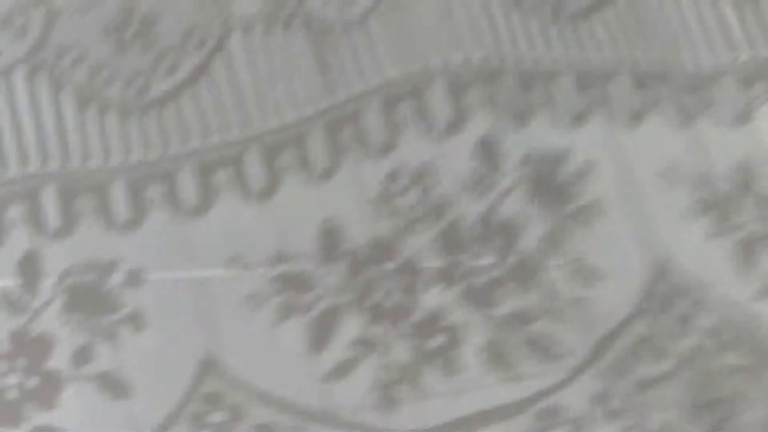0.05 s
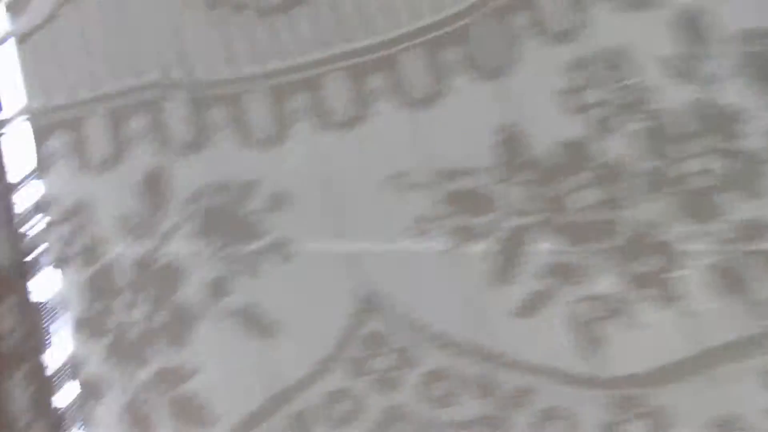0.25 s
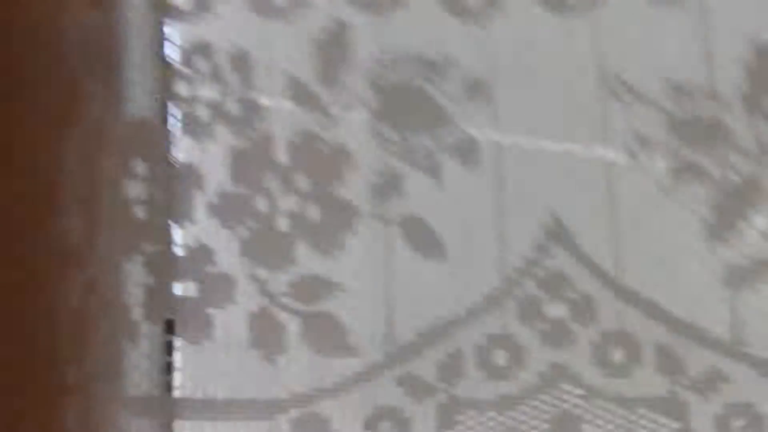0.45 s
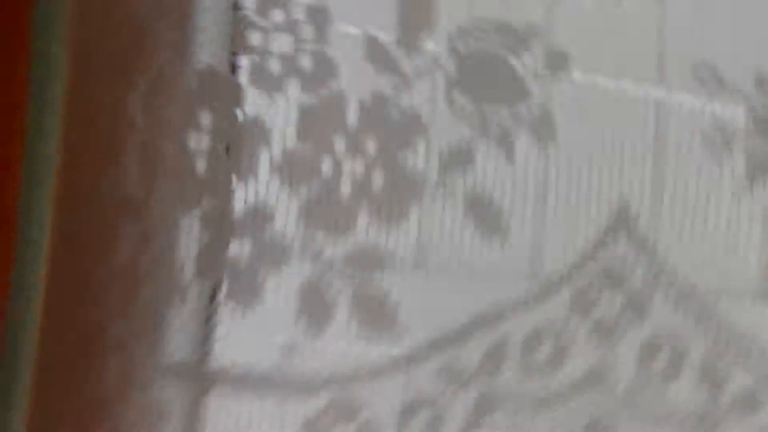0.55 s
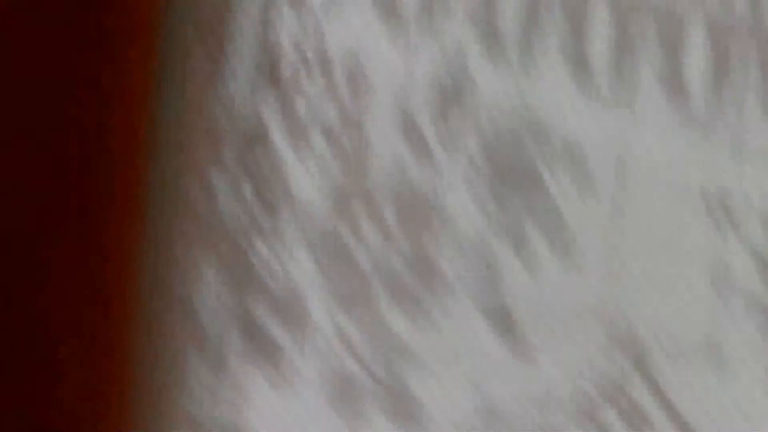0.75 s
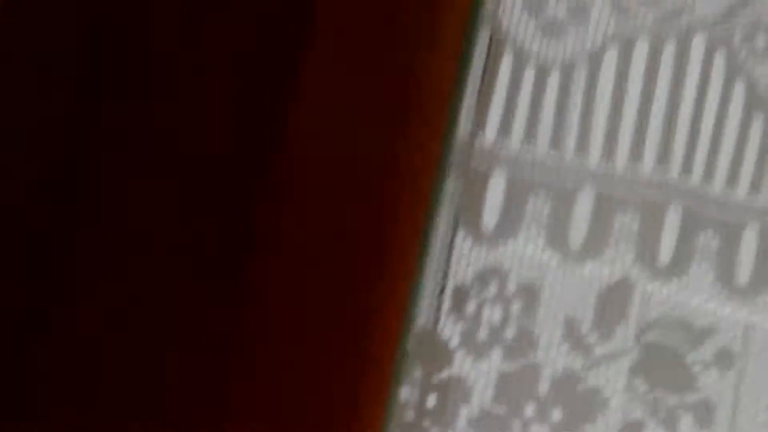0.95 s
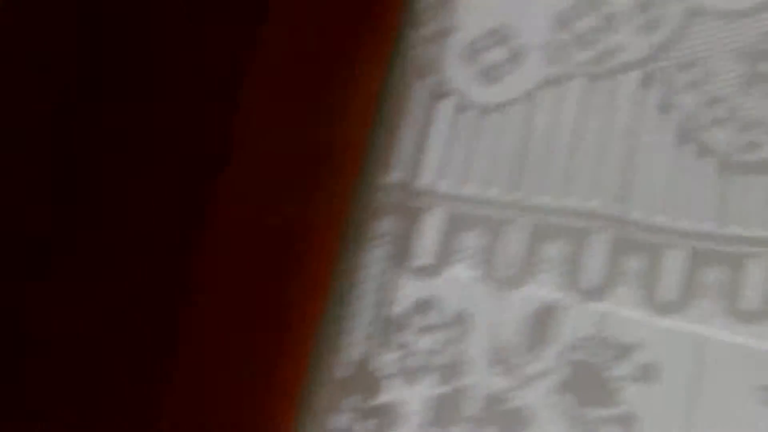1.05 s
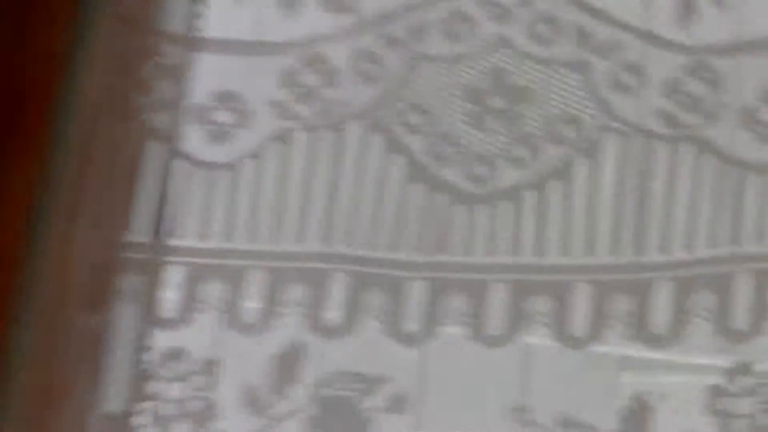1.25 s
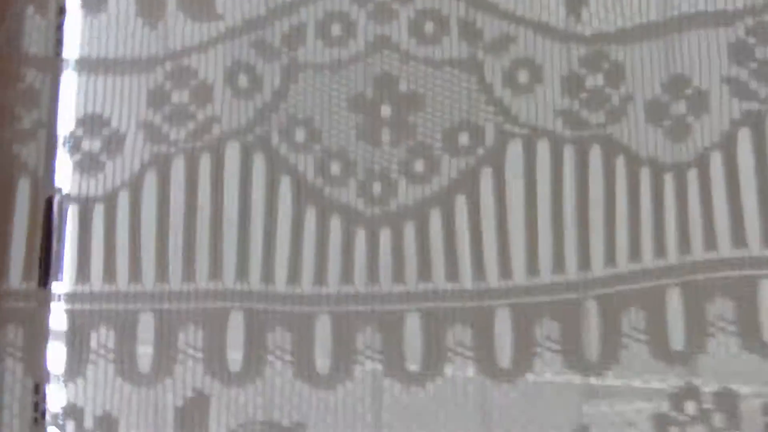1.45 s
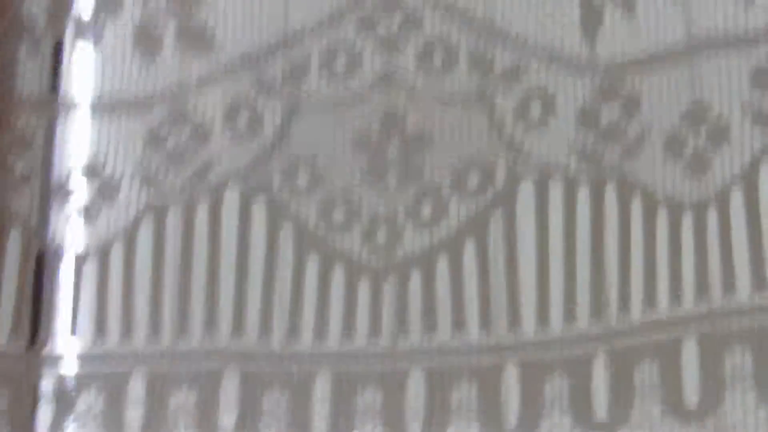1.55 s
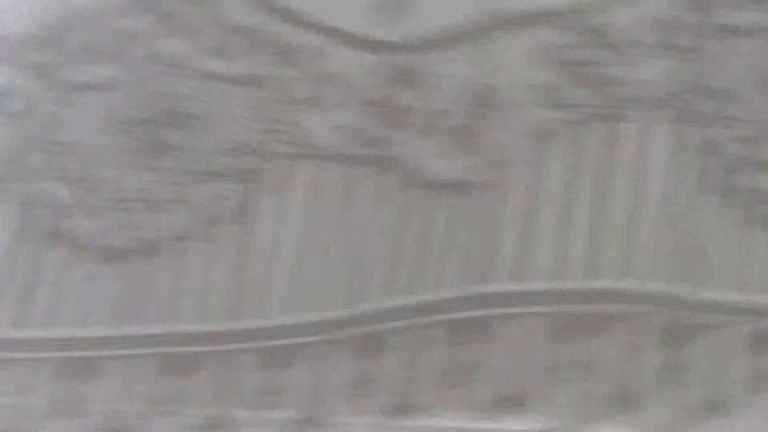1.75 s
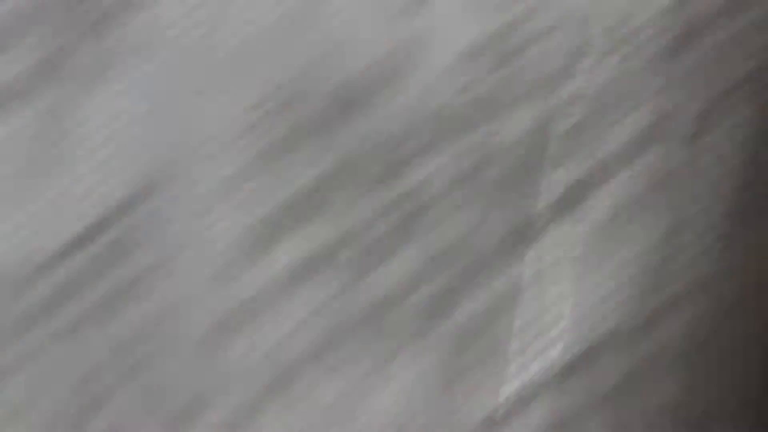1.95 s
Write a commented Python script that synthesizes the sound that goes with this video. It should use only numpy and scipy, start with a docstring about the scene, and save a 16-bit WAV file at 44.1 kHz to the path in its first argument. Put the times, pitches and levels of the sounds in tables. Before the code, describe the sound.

Curtain rings scrape along a metal rod with a brief squeak, then clack together. Sharp clicks and hollow knocks from fittings follow close to the microphone, over softly rustling lace in a small room.

```python
"""Lace curtain drawn aside

A small room, in stereo. Up on a metal rod the rings scrape, squeak once and clack together in a few tugs.
The cloth rustles and swishes as its fibres rub; close to the microphone hard fittings click and knock.
The room rings briefly, and the recorder's limiter ducks after the hardest click."""
import sys
import numpy as np
from scipy import signal
from scipy.fft import rfft, irfft, next_fast_len
from scipy.io import wavfile
from scipy.ndimage import uniform_filter1d, minimum_filter1d, map_coordinates

SR = 44100
rng = np.random.default_rng(int(sys.argv[2]) if len(sys.argv) > 2 else 0)


def waveform_to_disk(signal):
    """Save audio, clipped to [-1, 1], as 16-bit WAV at the path in sys.argv[1]."""
    frames = np.transpose(np.atleast_2d(signal))
    scaled = np.clip(frames, -1, 1) * 32767
    samples = np.round(scaled).astype(np.int16)
    wavfile.write(sys.argv[1], SR, samples)


N = 88200

SLIPS_PER_S, SLIP_SCATTER_DB, CHATTER_PER_S = 20000, 1.5, 120
DIRECT_SIDE_DB = -7.5  # sound that comes straight from its source is narrower


def amp(db):
    return 10 ** (np.asarray(db) / 20)


def unit(x):
    return x / np.sqrt(np.mean(x ** 2) + 1e-20)


def clock():
    return np.arange(N) / SR


def along(points, hz):
    """(f/Hz, value) points joined on a log frequency axis."""
    f, v = np.transpose(points)
    return np.interp(np.log(hz + 1), np.log(f + 1), v)


def curve(rows):
    """(t/s, value) points joined by straight lines."""
    return np.interp(clock(), *np.transpose(rows))


def wobble(per_s):
    """A smooth random curve with per_s knots a second."""
    return map_coordinates(rng.standard_normal(N // 20), [clock() * per_s], mode="wrap")


def burst(s, rise, t60):
    """An envelope that rises from time s, then dies away."""
    t = clock() - s
    return np.clip(t / rise, 0, 1) * amp(-60 * np.maximum(t - rise, 0) / t60)


def coloured(x, gain_db):
    """x through a causal filter of unit power with the given dB shape."""
    size = 2 * next_fast_len(N * 3 // 4)
    gain = unit(amp(gain_db(np.fft.rfftfreq(size, 1 / SR))))
    cepstrum = irfft(np.log(np.maximum(gain, 1e-6)), size)
    cepstrum[1:size // 2] *= 2  # folded for minimum phase
    cepstrum[size // 2 + 1:] = 0
    return irfft(rfft(x, size) * np.exp(rfft(cepstrum)), size)[..., :N]


def spread(pair, side_db=0):
    """Two unrelated signals become left and right: near mono in the bass, wide in the treble."""
    # width of diffuse sound at the microphone: f/Hz, side against mid/dB
    width = [(1000, -15.5), (2500, -23), (5000, -2.5), (12000, 1)]
    size = pair.shape[1]
    side = irfft(rfft(pair[1]) * amp(side_db + along(width, np.fft.rfftfreq(size, 1 / SR))), size)
    return np.array([pair[0] + side, pair[0] - side])


def grains(per_s, scatter_db, side_db):
    """Tiny contacts at random moments and of random size, in stereo."""
    hit = rng.random((2, N)) < per_s / SR
    size = np.sign(rng.standard_normal((2, N))) * amp(scatter_db * rng.standard_normal((2, N)))
    return spread(unit(hit * size), side_db)


def cloth():
    """Fibres rub all around as the folds shift; twice the lace swishes just ahead of the microphone."""
    # rustle of the cloth: t/s, level/dB
    rustle = [(0, -44), (.19, -43.5), (.26, -30), (.35, -42.5), (.48, -41.5), (.525, -26), (.57, -38),
              (.75, -36.5), (.82, -43.5), (1.05, -43), (1.16, -43.5), (1.32, -47), (1.52, -50),
              (1.578, -36.5), (1.605, -45.5), (1.9, -44), (1.97, -44), (2, -52)]
    # spectrum of the rustle: f/Hz, density/dB
    rustle_colour = [(30, -52), (170, -20.5), (380, -6), (650, 3.5), (2400, 3), (4500, -3.5), (15000, -11)]
    # light swishes: peak t/s, level/dB, rise/s, t60/s
    swishes = [(1.385, -38.5, 0.067, 0.28), (1.96, -32, 0.058, 0.46)]
    # spectrum of a swish: f/Hz, density/dB
    swish_colour = [(30, -56), (500, -9), (2500, 4.5), (10000, 2.5), (15000, 0.5)]
    rub = coloured(grains(per_s=5000, scatter_db=1.5, side_db=2.5), lambda hz: along(rustle_colour, hz))
    hiss = coloured(grains(SLIPS_PER_S, SLIP_SCATTER_DB, DIRECT_SIDE_DB),
                    lambda hz: along(swish_colour, hz))
    swell = sum(amp(db) * burst(s - rise, rise, t60) for s, db, rise, t60 in swishes)
    folds_db = wobble(per_s=57)
    return rub * amp(curve(rustle) + folds_db) + hiss * swell


def slips():
    """Dense metal contacts; as the rings turn, their many fine resonances flare and fade."""
    flare_db, spacing_hz, flares_per_s = 2.2, 130, 14
    hz, t, spectra = signal.stft(grains(SLIPS_PER_S, SLIP_SCATTER_DB, DIRECT_SIDE_DB), SR, nperseg=1024)
    grid = np.meshgrid(hz / spacing_hz, t * flares_per_s, indexing="ij")
    flares = map_coordinates(rng.standard_normal(spectra.shape[1:]), grid)
    return unit(signal.istft(spectra * amp(flare_db * flares), SR, nperseg=1024)[1][:, :N])


def metal_db(hz):
    """The broad scrape with the narrow resonances of rod and rings on top."""
    # broad spectrum of rings on the rod: f/Hz, density/dB
    scrape = [(40, -63), (110, -50), (320, -25), (620, -20.5), (1200, -13), (1480, -8), (1800, -15),
              (3100, -10), (3950, -1.5), (5400, -5), (6600, -4), (8000, -2), (12000, -2.36), (15000, -8)]
    # metal resonances: f/Hz, level over the broad spectrum/dB
    resonances = [(303, 6), (1440, 6), (1527, 7.5), (4160, 6), (4870, 8), (5360, 6.5), (6120, 2),
                  (8080, 5.5), (9335, 8.5), (9410, -1), (10400, 6), (10800, -3.5), (11700, 2.5), (12560, 1),
                  (13360, 10.5)]
    width_hz = 48
    peaks = sum(amp(db) ** 2 / (1 + (2 * (hz - f) / width_hz) ** 2) for f, db in resonances)
    return along(scrape, hz) + 10 * np.log10(1 + peaks)


def rings():
    """Chattering slips and clusters of collisions ring the same metal; each struck ring adds a ping."""
    # rings sliding on the rod: t/s, level/dB
    slide = [(.184, -46.5), (.193, -25.5), (.238, -16), (.372, -17), (.39, -18.5), (.48, -18.5),
             (.53, -27.5), (.58, -30), (.605, -18), (.64, -34), (.69, -31.5), (.76, -35), (.81, -48)]
    # rings colliding: t/s, level/dB, t60/s, brightness/(dB per octave), ping f/Hz
    clacks = [(0.013, -28.5, 0.028, -2.5, 3173), (.047, -38, 0.025, 0.5, 4540),
              (.413, -15, 0.054, -1, 4650), (0.458, -13.5, 0.095, -2.5, 4790),
              (0.501, -12.5, 0.033, 0, 3980), (0.535, -13.5, 0.054, 0, 5060), (0.549, -16, 0.019, 10, 5080),
              (0.584, -16, 0.043, -3, 4790), (.649, -16, 0.065, -2, 4460), (.825, -34.5, .1, 4, 5430),
              (1.078, -15, 0.075, 3, 5300), (1.158, -31.5, 0.057, -2, 3730),
              (1.354, -33.5, 0.025, -2, 4200), (1.593, -21, 0.15, -0.5, 5380),
              (1.599, -19.5, 0.032, -1.5, 3560), (1.7604, -13, 0.04, 0, 4290),
              (1.915, -34.5, 0.021, 5, 6060)]
    chatter_db, rise_s = 1.8, 0.0042
    ping_db, ping_t60, overtone_ratio = -9.5, 0.042, 2.3
    force = slips() * amp(curve(slide) + chatter_db * wobble(CHATTER_PER_S))
    contact_spectrum, pings = rfft(slips()), np.zeros(N)
    octaves = np.log2(np.clip(np.fft.rfftfreq(N, 1 / SR), 1500, 14000) / 8000)
    for s, db, t60, bright_db, hz in clacks:
        contacts = irfft(contact_spectrum * amp(bright_db * octaves), N)
        force += amp(db) * burst(s, rise_s, t60) * contacts
        phase = 2 * np.pi * hz * (clock() - s)
        tone = np.sin(phase) + np.sin(overtone_ratio * phase)
        pings += amp(db + ping_db) * burst(s, rise_s, ping_t60) * tone
    return coloured(force, metal_db) + pings


def struck(blows, modes, attack_s, crack_db, crack_rise_s, crack_t60, lag_s):
    """Each blow rings damped modes under a short crack; the modes reach the right channel lag_s late."""
    # spectrum of the crack: f/Hz, density/dB
    crack_colour = [(30, -36), (250, -37), (500, -12), (1500, 4), (3500, 11.5), (7000, 0), (15000, -17)]
    ringing, envelope = np.zeros((2, N)), np.zeros(N)
    t = np.maximum(np.arange(SR // 10) / SR - np.array([[0], [lag_s]]), 0)
    for s, db, pitch, bright_db in blows:
        start = round(s * SR)
        for k, (hz, level, t60) in enumerate(modes):
            mode_db = db + level + bright_db * np.log2(hz / modes[0][0]) + rng.normal(0, 1)
            tone = (-1) ** k * amp(mode_db - 60 * t / t60) * np.sin(2 * np.pi * hz * pitch * t)
            ringing[:, start:start + t.shape[1]] += tone * (1 - np.exp(-t / attack_s))
        envelope += amp(db + crack_db + bright_db) * burst(s, crack_rise_s, crack_t60)
    cracks = envelope * spread(rng.standard_normal((2, N)), DIRECT_SIDE_DB)
    return ringing + coloured(cracks, lambda hz: along(crack_colour, hz))


def clicks():
    """A hard fitting is struck sharply, close to the microphone."""
    # blows on the fitting: t/s, level/dB, pitch ratio
    blows = [(.015, -24.5, 1.11), (.616, -12.5, 0.98), (0.9141, -30.5, .9), (.9724, 4, 0.98),
             (.9862, -15, 0.79), (1.161, -18.5, 1.8), (1.171, -21.5, 1.44), (1.54, -25, .95)]
    # modes of the fitting: f/Hz, level/dB, t60/s
    modes = [(1060, -15, 0.024), (1797, -6.5, 0.025), (2120, -10, 0.03), (2627, -0.5, .016),
             (3075, 1.5, 0.011), (3705, -6.5, 0.016), (4680, -10.5, 0.026), (7830, -9, .009)]
    return struck([(*row, 0) for row in blows], modes, attack_s=0.0008,
                  crack_db=-10, crack_rise_s=0.000049, crack_t60=0.015, lag_s=0.00009)


def squeak():
    """For a moment a ring sticks and slips regularly; the partial on the rod's resonance stands out."""
    # partials of the squeak: harmonic number -> level/dB
    partials = {1: -38.5, 2: -39.5, 5: -20, 8: -27}
    pitch_hz, jitter = 307.4, 0.0065
    phase = 2 * np.pi * np.cumsum(pitch_hz * (1 + jitter * wobble(CHATTER_PER_S))) / SR
    tone = sum(amp(db) * np.sin(k * phase) for k, db in partials.items())
    return burst(s=0.246, rise=0.025, t60=0.18) * tone


def knocks():
    """Blunter blows on a nearby fitting ring lower, hollow modes; one soft blow, with the same modes, gives
    body to a ring clack on the rod."""
    # hollow knocks: t/s, level/dB, pitch ratio, brightness/(dB per octave); the row at 1.081 s is the body
    # under a ring clack
    blows = [(.517, -9.5, .9, -4.5), (1.081, -29.5, 0.87, -1.5), (1.7225, -8, 1, -0.16),
             (1.73, -18.5, 1.2, 0)]
    # modes of the knock: f/Hz, level/dB, t60/s
    modes = [(634, -7.5, 0.019), (1114, -1, 0.0099), (1570, -0.5, 0.024), (2582, 3.5, 0.014),
             (3350, -21, 0.022), (3924, -1.5, 0.023), (5510, -5, .021)]
    return struck(blows, modes, attack_s=0.0015,
                  crack_db=-7.5, crack_rise_s=0.0014, crack_t60=0.024, lag_s=0.00002)


def room(x, wet_db):
    """x with the small room's answer, each frequency dying at its own speed."""
    # decay of the room: f/Hz, t60/s
    decay = [(200, 0.17), (4500, 0.39), (9000, 0.23), (15000, 0.12)]
    hz, t, spectra = signal.stft(rng.standard_normal((2, SR // 2)), SR, nperseg=256)
    tail = signal.istft(spectra * amp(-60 * t / along(decay, hz)[:, None]), SR, nperseg=256)[1]
    tail = spread(tail / np.linalg.norm(tail[0]))
    tail = np.pad(tail, ((0, 0), (SR // 200, 0)))  # 5 ms behind the direct sound
    return x + amp(wet_db) * signal.fftconvolve(x.mean(axis=0)[None], tail, axes=1)[:, :N]


def scene():
    """Rings up on the rod, cloth and fittings close by, all slightly left of the microphone."""
    clicking, knocking = clicks(), knocks()
    on_rod = room(rings(), wet_db=-6) + squeak()
    close_by = room(clicking, wet_db=-24.5) + room(knocking, wet_db=-6.5) + cloth()
    return (on_rod + close_by) * amp([[0.25], [-0.25]])


def record(dry):
    """The recorder: a fast limiter with a slow release, then a steep treble cut."""
    ceiling_db, release_db_per_s, top_hz = -1.3, 45.5, 15300
    over_db = np.maximum(20 * np.log10(np.abs(dry).max(axis=0) + 1e-9) - ceiling_db, 0)
    release_db = release_db_per_s * clock()
    gain = amp(release_db - np.maximum.accumulate(over_db + release_db))
    gain = uniform_filter1d(minimum_filter1d(gain, size=45), size=45)  # 1 ms attack, ahead of the peak
    hz = np.fft.rfftfreq(2 * N, 1 / SR)
    return irfft(rfft(dry * gain, 2 * N) / np.sqrt(1 + (hz / top_hz) ** 200))[:, :N]


dry = scene()
out = record(dry)
waveform_to_disk(out)
```